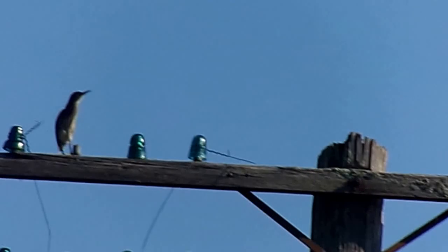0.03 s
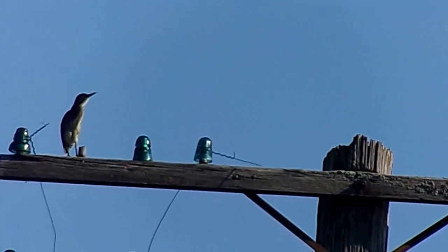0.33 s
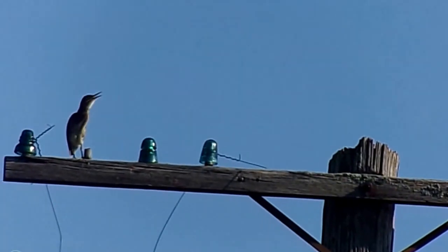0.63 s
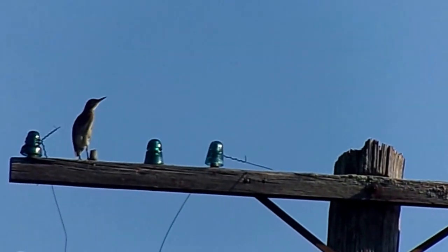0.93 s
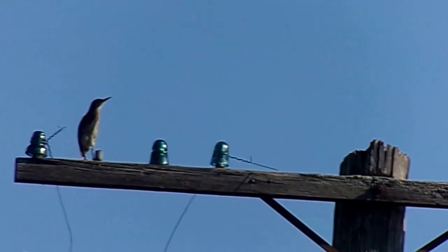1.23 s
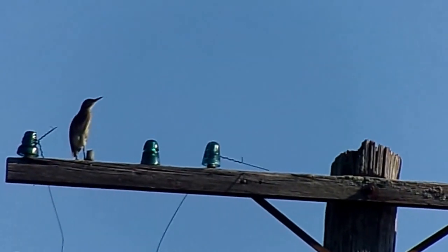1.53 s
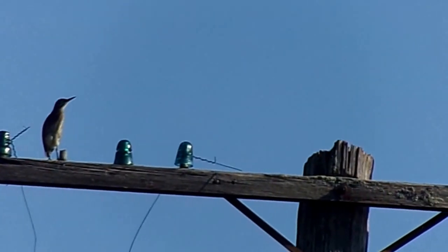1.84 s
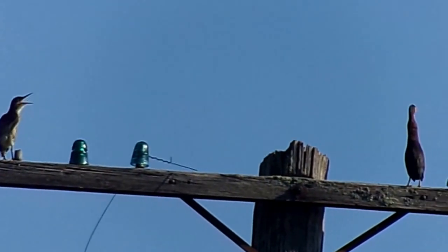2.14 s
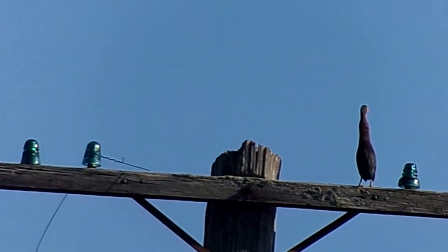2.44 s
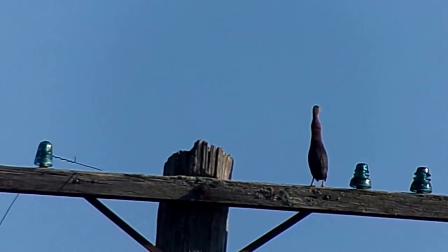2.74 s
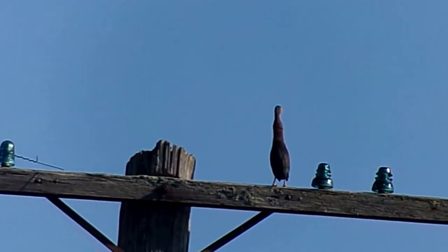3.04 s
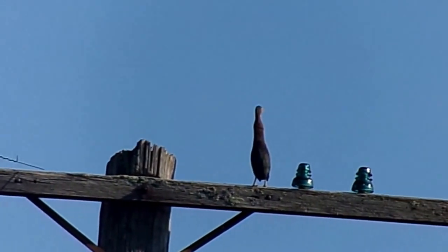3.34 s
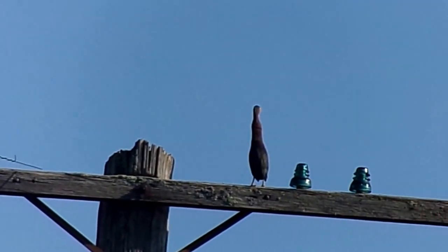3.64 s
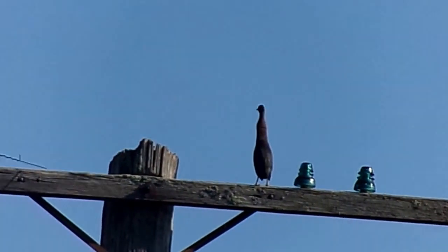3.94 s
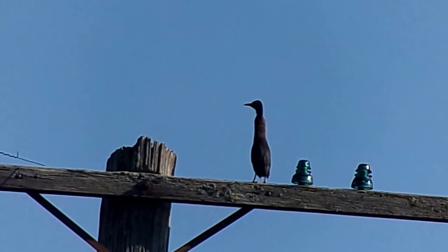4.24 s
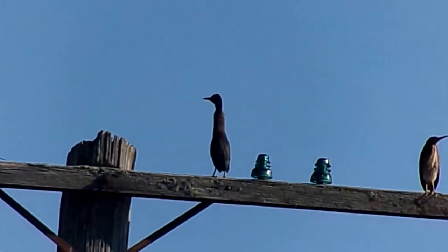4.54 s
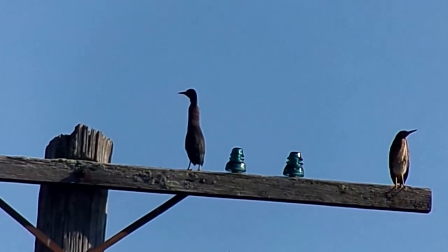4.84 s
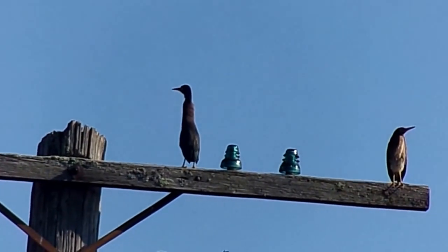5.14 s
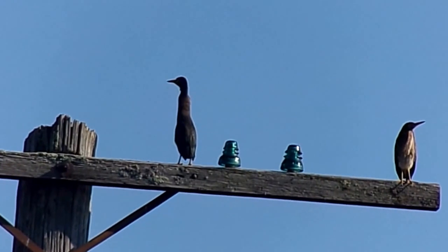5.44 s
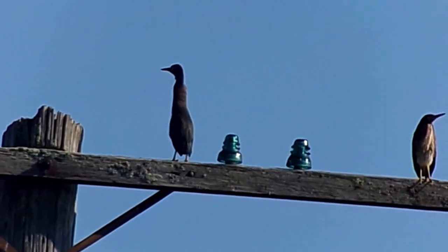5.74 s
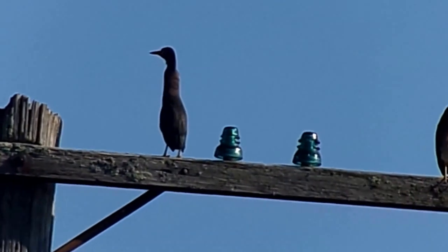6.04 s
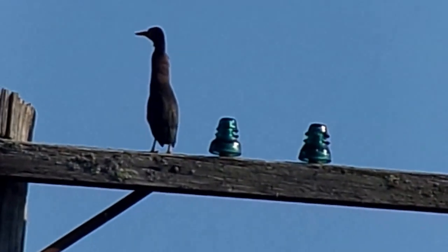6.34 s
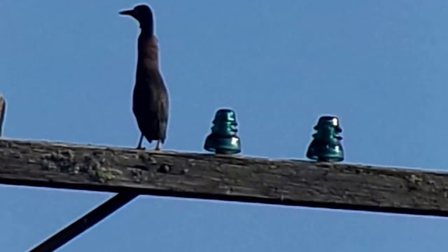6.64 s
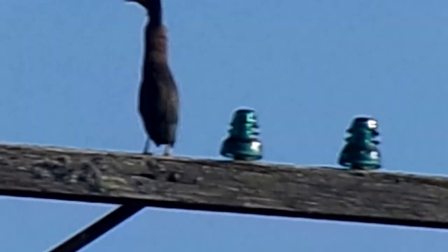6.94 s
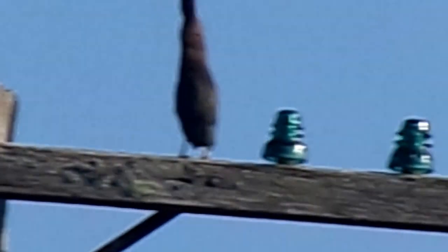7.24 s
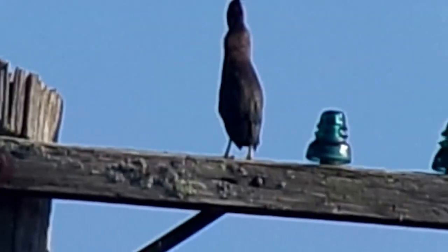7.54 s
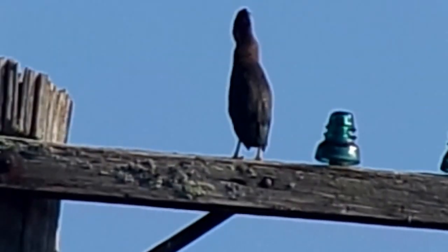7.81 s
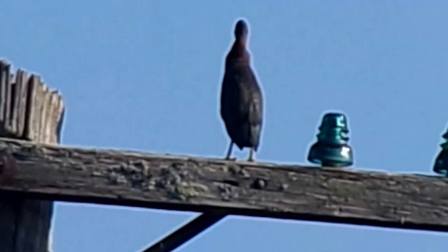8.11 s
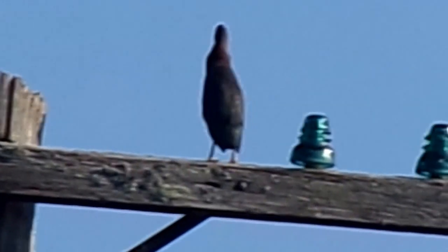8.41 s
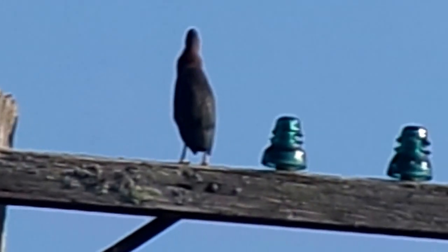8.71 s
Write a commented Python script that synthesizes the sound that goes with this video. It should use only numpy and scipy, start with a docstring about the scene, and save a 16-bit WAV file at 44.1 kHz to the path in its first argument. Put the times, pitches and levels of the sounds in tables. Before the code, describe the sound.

A heron calls four times outdoors, each a brief rising squeal that breaks into a falling rasp and rings on in the trees. Three calls come fairly close together, the last after a longer pause. Small birds chirp faintly far off over a low traffic rumble and steady microphone hiss. The hand-held camera clicks lightly in the grip, with one loud click just before the final call.

```python
"""A green heron on a power pole gives four 'skeow' calls: its syrinx sings a clean rising squeal, then
slackens into a falling rasp that rings on in the trees. Small birds and an insect sound far off over
distant traffic; a low hum swells twice. The hand-held camera clicks in the grip, once loudly, and its
microphone hisses."""
import sys
import numpy as np
from scipy import signal
from scipy.fft import rfft, irfft, next_fast_len
from scipy.io import wavfile

SR = 44100
rng = np.random.default_rng(int(sys.argv[2]) if len(sys.argv) > 2 else 0)


def dump(signal):
    """Clip the signal to [-1, 1] and save it as 16-bit WAV at the path in sys.argv[1]."""
    limited = np.clip(np.atleast_2d(signal).T, -1, 1)
    pcm = np.round(limited * 32767).astype(np.int16)
    wavfile.write(sys.argv[1], SR, pcm)


N = 386757


def heron():
    """Four calls, each with its own squeal, all breaking at the same pitch."""
    # (onset [s], rise [s], squeal length [s], onset pitch [Hz], crest [Hz], level [dB], rasp fade [dB])
    calls = [(0.596, .018, .050, 2143, 2460, -23.5, -26), (2.284, .015, .051, 2177, 2450, -23.5, -23.5),
             (3.822, 0.0193, .045, 2215, 2490, -24, -27), (7.533, 0.029, 0.034, 2190, 2362, -24, -31)]
    out = np.zeros(N)
    for onset, *shape in calls:
        add(out, onset, skeow(*shape))
    return out


def skeow(rise_s, squeal_s, onset_hz, crest_hz, level_db, fade_db, break_hz=2310, end_hz=1506, fall_s=.19):
    """One call: the syrinx sings cleanly, then flutters chaotically as its tension drops."""
    # overtones ahead of the throat: (multiple of the pitch, level [dB])
    overtone_levels = [(2, -6), (3, -11), (4, -11), (5, -13), (6, -13)]
    # resonance of the throat and open bill: (frequency [Hz], gain [dB])
    throat = [(300, -38), (550, -7.5), (900, -33), (1300, -29), (2000, 4), (2900, -5), (3500, -6.5),
              (4500, -2.5), (5800, 3), (6900, -2), (8200, -23), (9000, -20), (9800, -8.5), (11200, -17),
              (13000, -18), (15500, -39)]
    # half tones from uneven cycles before the voice settles: (multiple of the pitch, level [dB])
    half_tones = [(1.5, -41), (2.5, -33)]
    # sidebands of the rasp: (offset from the pitch [flutter rates], level [dB])
    side_tones = [(-2, -19), (-1, -8), (1, -37), (2, -29)]
    end = squeal_s + fall_s
    t = np.arange(int(end * SR)) / SR
    size = len(t)
    rise = np.clip(t / rise_s, 0, 1)
    sag = np.clip((t - rise_s) / max(squeal_s - rise_s, .002), 0, 1)
    fall = np.clip((t - squeal_s) / fall_s, 0, 1)
    # the pitch creeps up, flips to its crest, sags, then slides away
    hz = onset_hz + (crest_hz - onset_hz) * (rise + rise ** 8) / 2 + (break_hz - crest_hz) * sag
    hz += (end_hz - break_hz) * (1 - (1 - fall) ** 1.5)
    # roughness creeps in just before the break; the slackening voice frays more and more
    rough = .5 + .5 * np.tanh((t - squeal_s + .002) / .007)
    jitter = .004 * wander(size, 600) + .056 * rough * wander(size, 1500)
    fray = .029 * rough * np.sqrt(fall) * wander(size, 900)
    phase = cycles(hz * (1 + jitter + fray))
    # pressure builds through the rise and eases halfway down the sag
    tone = np.sin(phase) * undb(-10 * (1 - rise) - 3.1 * np.sin(np.pi * sag) + 2 - 2.7 * rough)
    tone *= 1 + .4 * rough * wander(size, 700)
    # each overtone swells and fades as it slides across the throat's resonances
    overtones = np.zeros(size)
    for k, db in overtone_levels:
        throat_db = np.interp(k * hz, *np.transpose(throat))
        overtones += undb(db + throat_db + 2 * wander(size, 177)) * np.sin(k * phase)
    overtones *= undb(2.3 - 4.7 * (1.5 - rise) - 7.3 * rough - 7.9 * fall)
    halves = (1 - rise ** 4) * sum(undb(db) * np.sin(k * phase) for k, db in half_tones)
    # a second, unsteady vibration throws sidebands around the pitch
    flutter = cycles(225 * (1 - .6 * fall) * (1 + .15 * wander(size, 200)))
    sides = sum(undb(db) * np.sin(phase + k * flutter + cycles(80 * wander(size, 500)))
                for k, db in side_tones)
    # dense, irregular slaps of the membranes ring the throat
    slaps = rng.standard_normal(size) * undb(2.5 * wander(size, 1500) + 3 * np.sin(2 * flutter))
    rasp = unit(colour(slaps, throat)) * undb(-4 - 14 * fall ** 2.1)
    voice = np.sqrt(2) * (tone + overtones + halves + rough * sides) + rough * rasp
    gate = np.clip(t / .0019, 0, 1) * np.clip((end - t) / .025, 0, 1)
    return voice * gate * undb(level_db - 3.5 * rough + fade_db * fall ** .96)


def trees(x, wet_db=-16.5, low_t60=1.6, high_t60=.81, near_db=-24, near_t60=.17):
    """Reverb: sparse early echoes from nearby things, then a long, darkening scatter from the trees."""
    t = np.arange(int(1.6 * SR)) / SR
    uneven = undb(1.5 * wander(len(t), 60))
    scatter = rng.standard_normal(len(t)) * uneven * np.clip((t - .03) / .08, 0, 1)
    low = colour(scatter, [(1400, -.5), (2000, 2.5), (2450, -.5), (4800, -1), (7000, -22), (10000, -45)])
    high = colour(scatter, [(2500, -35), (4800, -1), (7000, -2), (14000, 8)])
    low_decay, high_decay = undb(-60 * t / low_t60), undb(-60 * t / high_t60)
    tail = (low * low_decay + high * high_decay) / np.linalg.norm(scatter * low_decay)
    taps = rng.standard_normal(len(t)) * (rng.random(len(t)) < .004)
    near = taps * (t > .03) * undb(-60 * t / near_t60)
    return signal.fftconvolve(x, undb(wet_db) * tail + undb(near_db) * near / np.linalg.norm(near))[:N]


def camera_clicks(lag_s=.00135, preroll_s=.015):
    """The grip scrapes the case: a jolt's thump and bright tick, then a knock and a snap."""
    # (time [s], snap level [dB], knock against the snap [dB], jolt [dB], contact [s])
    grip_clicks = [(1.294, -53.5, 6.5, -6.5, .003), (1.344, -62, 12, -11, 0.0037),
                   (1.423, -51, 5, -7.5, 0.0033), (1.581, -52, 1.5, -6.5, 0.0053),
                   (2.208, -48, -4, -22, 0.0022), (3.942, -40, -9, -2, .001),
                   (4.066, -29.5, -14, -11, 0.0019), (4.195, -45.5, -6.5, -8, .011),
                   (4.312, -42.5, -1, -16, .0024), (4.428, -60.5, 11.5, -6, 0.0091),
                   (4.822, -48.5, -15, 6.5, .001), (6.989, -17, -14, 0, 0.0031)]
    # resonances of the case, low to high: (frequency [Hz], nominal width [Hz], level [dB])
    case_modes = [(564, 104, -1), (723, 110, -3.5), (1243, 163, 0), (1800, 300, -4), (2190, 250, 2.5),
                  (3250, 510, 5), (4000, 170, 5), (5150, 230, 0), (6320, 250, -8.5), (10900, 930, -12),
                  (12550, 1700, 7)]
    out = np.zeros(N)
    t = np.arange(int(4 * preroll_s * SR)) / SR - preroll_s
    late = t - lag_s
    for at, db, knock_db, jolt_db, contact_s in grip_clicks:
        thump = scrape(t, contact_s, case_modes[:2], fade_ms=.83) * undb(knock_db + jolt_db + 4)
        knock = scrape(late, contact_s, case_modes[2:3], fade_ms=6) * undb(knock_db)
        snap = scrape(late, contact_s, case_modes[3:9], fade_ms=2.4)
        tick = scrape(t, contact_s, case_modes[9:], fade_ms=1.4) * undb(jolt_db - 6.5)
        add(out, at - preroll_s, (thump + knock + snap + tick) * undb(db))
    return out


def scrape(t, contact_s, modes, fade_ms):
    """Grit pressed for the contact time rings some of the case's resonances."""
    attack = np.exp(np.minimum(t + contact_s / 2, 0) / .0014)
    release = np.exp(-np.maximum(t - contact_s / 2, 0) / (fade_ms / 1000))
    push = attack * release
    grit = push * rng.standard_normal(len(t))
    ring = sum(undb(db) * unit(resonate(resonate(grit, hz, 2 * width), hz, 2 * width))
               for hz, width, db in modes)
    return unit(ring) * np.std(push)


def small_birds(pivot_db=-58):
    """All the distant birds: their direct sound and their reverb send to the trees."""
    direct, send = np.zeros(N), np.zeros(N)
    for song in (chips, pips, cries, whistles, lisps):
        for start, db, sound in song():
            send_db = pivot_db + 4 + 1.05 * (db - pivot_db)
            add(direct, start, sound * undb(db))
            add(send, start, sound * undb(send_db))
    return direct, send


def note(length_s, first_hz, middle_hz, last_hz, scratch=.013, flicker_db=3.8):
    """A near-sine bird note gliding through three pitches as its level flickers."""
    progress = np.linspace(0, 1, int(length_s * SR))
    size = len(progress)
    hz = np.polyval(np.polyfit([0, .5, 1], [first_hz, middle_hz, last_hz], 2), progress)
    swell = np.sqrt(np.abs(np.sin(np.pi * progress))) * undb(flicker_db * wander(size, 130))
    return swell * np.sin(cycles(hz * (1 + scratch * wander(size, 1100))))


def chips(length_s=.036, repeat_db=-9, upper_ratio=1.1, upper_db=-9):
    """A scratchy arch sung by both sides of the syrinx, then a weaker repeat."""
    # (time [s], lower voice's mid-note pitch [Hz], level [dB])
    double_chips = [(3.312, 5560, -43), (5.944, 5920, -44)]
    for at, middle_hz, db in double_chips:
        for start, chip_db in ((at, db), (at + length_s, db + repeat_db)):
            lower, upper = (note(length_s, .92 * hz, hz, .85 * hz, scratch=.02)
                            for hz in (middle_hz, upper_ratio * middle_hz))
            yield start, chip_db, lower + undb(upper_db) * upper


def pips():
    """The same short downward slur, now and then."""
    # (time [s], level [dB])
    pip_cues = [(1.178, -54), (1.632, -60), (1.947, -55), (2.957, -57), (4.679, -55), (5.806, -60)]
    for at, db in pip_cues:
        yield at, db, note(length_s=.049, first_hz=4450, middle_hz=4275, last_hz=4135)


def cries():
    """Thin, wavering far cries that all sag by the same share of their pitch."""
    # (time [s], length [s], starting pitch [Hz], level [dB])
    cry_cues = [(3.30, 0.38, 1080, -63), (5.198, .24, 1180, -66), (5.814, .43, 1075, -60),
                (6.714, .24, 1055, -56.5), (7.635, 0.2, 1010, -57)]
    # harmonics over a missing fundamental: (multiple of the pitch, level [dB])
    cry_harmonics = [(2, -8), (3, 1), (4, -3)]
    for at, length_s, hz, db in cry_cues:
        cry = sum(note(length_s, k * hz, k * hz * .935, k * hz * .88, scratch=.02, flicker_db=3.5)
                  * undb(harmonic_db) for k, harmonic_db in cry_harmonics)
        yield at, db, cry


def whistles(start_s=.46, step_s=.56, hz=6110, db=-68):
    """Three faint, level whistles at an even pace."""
    for i in range(3):
        yield start_s + i * step_s, db, note(.16, hz, hz, hz)


def lisps(start_s=5.5, step_s=.11, db=-66):
    """A quick run of four high, rising notes."""
    for i in range(4):
        yield start_s + i * step_s, db, note(length_s=.052, first_hz=6550, middle_hz=6950, last_hz=7250)


def insect(start_s=2.7, step_s=.4, hz=8400, db=-77):
    """Short high buzzes of narrow noise at a loose pace."""
    out = np.zeros(N)
    window = np.hanning(int(.09 * SR))
    for at in start_s + step_s * (np.arange(16) + .12 * rng.standard_normal(16)):
        if at * SR < N:
            noise = rng.standard_normal(len(window))
            buzz = resonate(resonate(noise, hz, 400), hz, 400)
            add(out, at, window * unit(buzz))
    return out * undb(db)


def traffic(rumble_db=-57, drone_hz=366, drone_db=-65):
    """Far traffic: a gently breathing rumble with a wavering drone."""
    # (frequency [Hz], gain [dB])
    rumble_spectrum = [(20, -36), (40, -24), (75, -12.5), (115, -3.5), (200, -1), (330, -0.5), (430, -2.5),
                       (520, -4), (750, -6.5), (1000, -11.5), (2000, -15), (4000, -57)]
    rumble = unit(colour(rng.standard_normal(N), rumble_spectrum))
    rumble *= undb(rumble_db + .14 * wander(N, 1.99) + .67 * wander(N, 13))
    drone = np.sin(cycles(drone_hz + 3 * wander(N, 20)))
    return rumble + drone * undb(drone_db + .67 * wander(N, 3.2))


def hum():
    """A low far-off tone that swells and fades in one arch each time."""
    # (start [s], length [s], pitch [Hz], level [dB])
    hum_swells = [(5.33, .93, 149.3, -61), (7.52, 0.8, 147.6, -56)]
    out = np.zeros(N)
    for start, length_s, hz, db in hum_swells:
        size = int(length_s * SR)
        swell = np.sin(np.linspace(0, np.pi, size)) * undb(db + wander(size, 14))
        add(out, start, np.sqrt(2) * swell * np.sin(cycles(hz + 1.4 * wander(size, 15))))
    return out


def microphone_hiss(db=-56):
    """The microphone's steady noise floor."""
    # (frequency [Hz], gain [dB])
    hiss_spectrum = [(700, -16.5), (1050, -10), (1240, 3), (1450, -4.5), (2200, -3), (3300, -4.5),
                     (4650, 1), (5500, -10), (6700, -12.5), (8600, -25.5), (10400, -16), (11400, -21),
                     (13000, -10.5), (15500, -25.5)]
    return unit(colour(rng.standard_normal(N), hiss_spectrum)) * undb(db)


def undb(db):
    """Decibels to gain."""
    return 10 ** (np.asarray(db) / 20)


def unit(x):
    """Scale to rms 1."""
    return x / (np.std(x) + 1e-12)


def colour(x, points):
    """Equalise along a curve of (frequency [Hz], gain [dB]) points."""
    hz, db = np.transpose(points)
    size = 2 * next_fast_len(len(x) // 2 + 1)
    bin_hz = np.maximum(np.arange(size // 2 + 1) * SR / size, 1)
    gain = undb(np.interp(np.log(bin_hz), np.log(hz), db))
    return irfft(rfft(x, size) * gain, size)[:len(x)]


def resonate(x, hz, width_hz):
    """Two-pole resonance, gain 1 at the centre."""
    return signal.lfilter(*signal.iirpeak(min(hz, .45 * SR), hz / width_hz, fs=SR), x)


def wander(size, rate):
    """Random drift of spread 1 that turns rate times a second."""
    hold = max(int(SR / rate), 1)
    steps = rng.standard_normal(size // hold + 2)
    return np.sqrt(3 / 2) * np.interp(np.arange(size) / hold, np.arange(len(steps)), steps)


def cycles(hz):
    """Phase in radians of a moving frequency."""
    return 2 * np.pi * np.cumsum(hz) / SR


def add(track, start_s, sound):
    """Mix a sound into the track at a time."""
    i = max(int(start_s * SR), 0)
    track[i:i + len(sound)] += sound[:N - i]


def scene():
    """The birds share the open-air echo; the clicks are dry, right at the microphone."""
    calls = heron()
    chirps, chirp_send = small_birds()
    birds = calls + chirps + trees(calls + chirp_send)
    return (birds + insect() + camera_clicks() + traffic() + hum() + microphone_hiss())[None]


def record(dry):
    """The microphone's notches, a short fade-in and a steep top cut."""
    # dips in the microphone's response: (frequency [Hz], width [Hz])
    mic_notches = [(3720, 626), (7860, 136), (11780, 410)]
    fade_from_db, fade_s, top_hz = -21, .52, 15650
    for hz, width_hz in mic_notches:
        dry = dry - resonate(dry, hz, width_hz)
    t = np.arange(N) / SR
    dry = dry * undb(fade_from_db * np.clip(1 - t / fade_s, 0, 1))
    return signal.sosfilt(signal.ellip(10, .2, 70, top_hz, fs=SR, output="sos"), dry)


dry = scene()
out = record(dry)
dump(out)
```